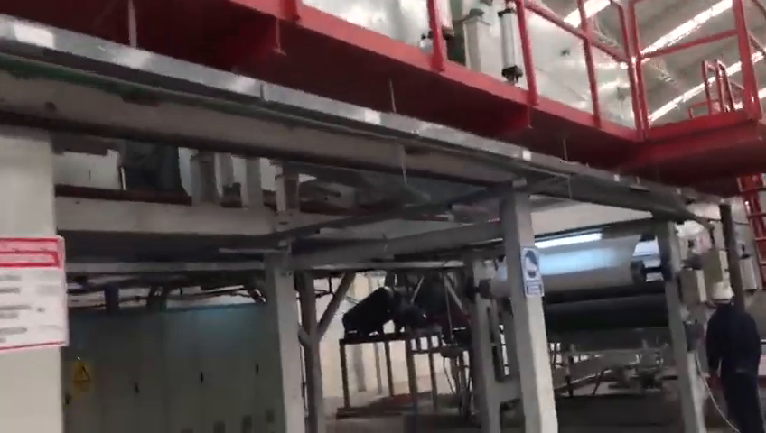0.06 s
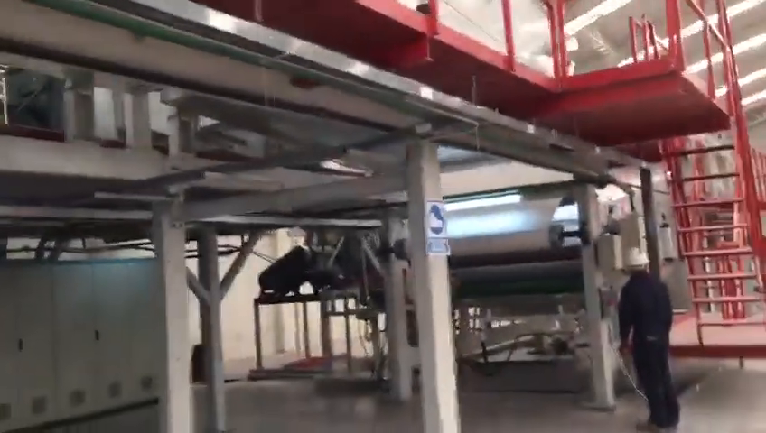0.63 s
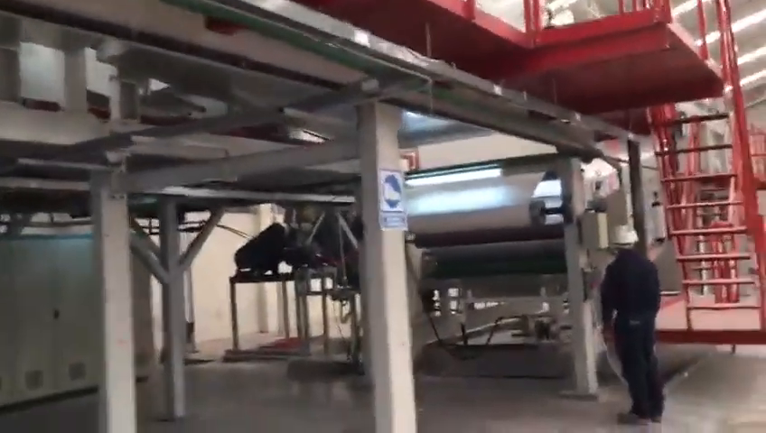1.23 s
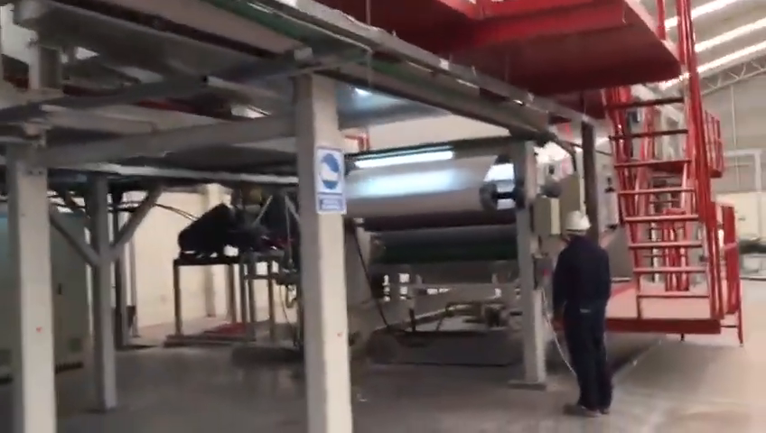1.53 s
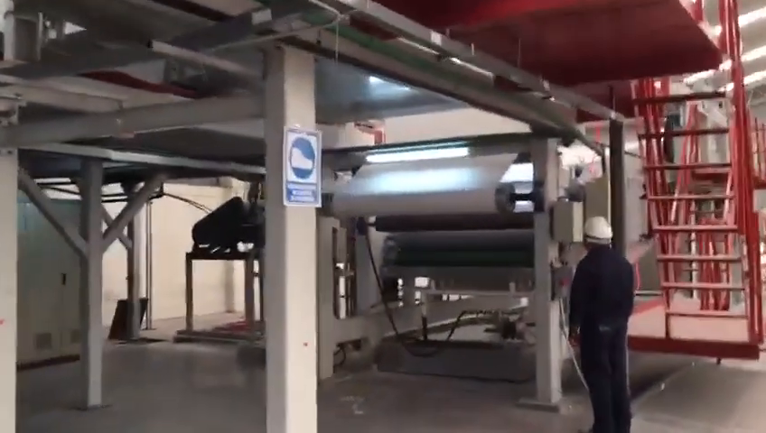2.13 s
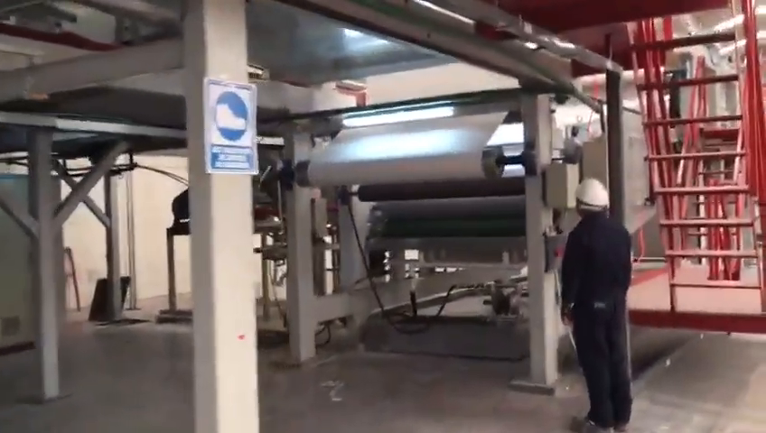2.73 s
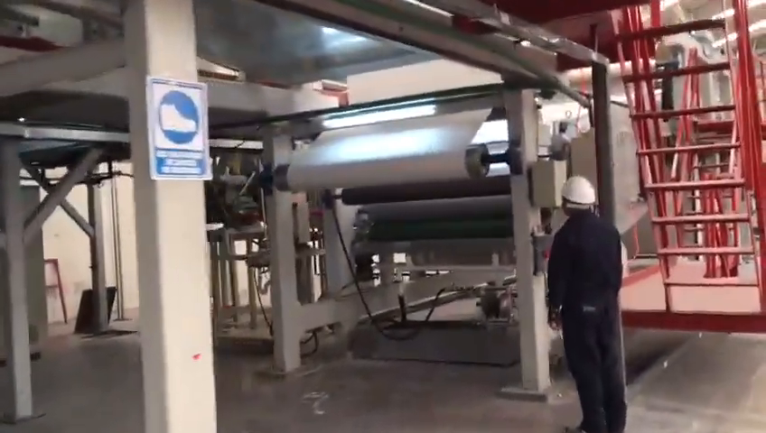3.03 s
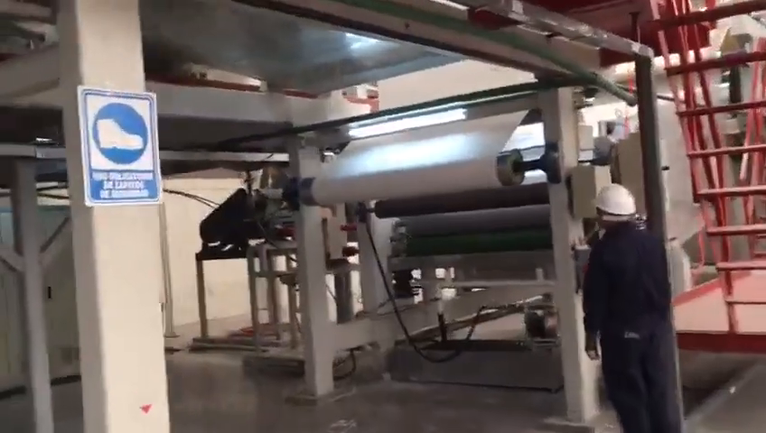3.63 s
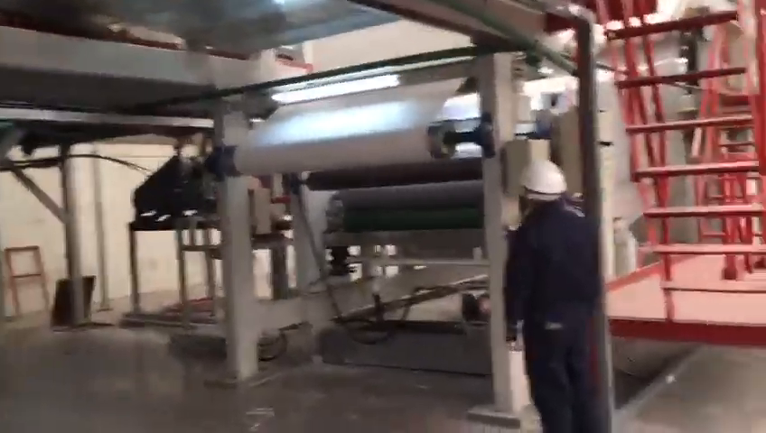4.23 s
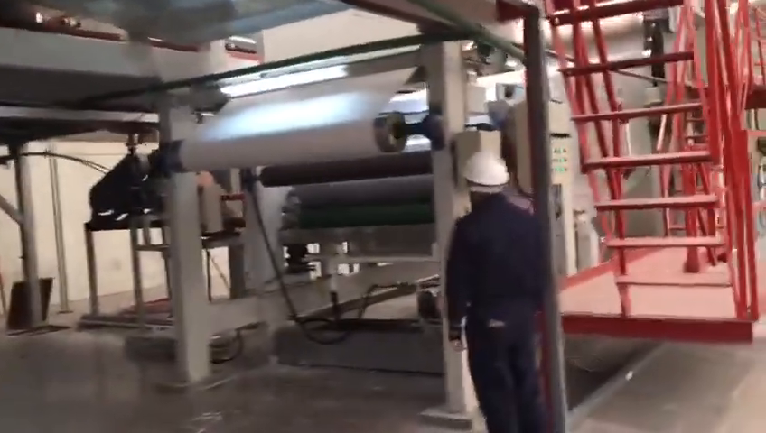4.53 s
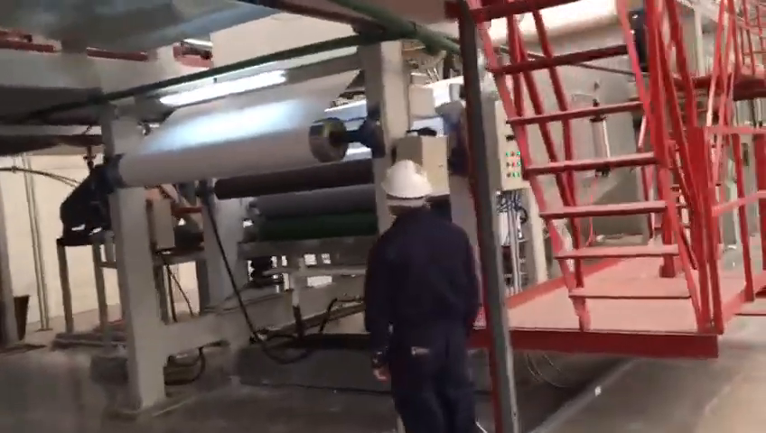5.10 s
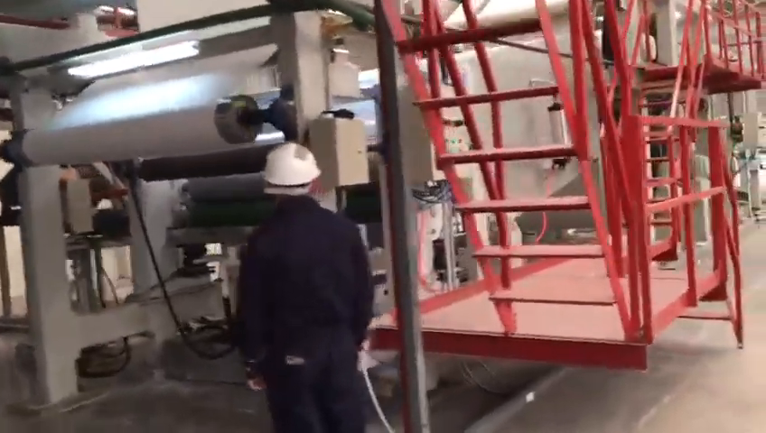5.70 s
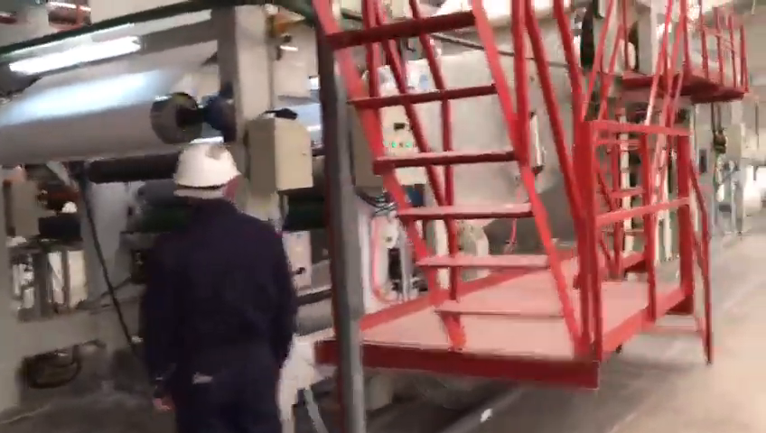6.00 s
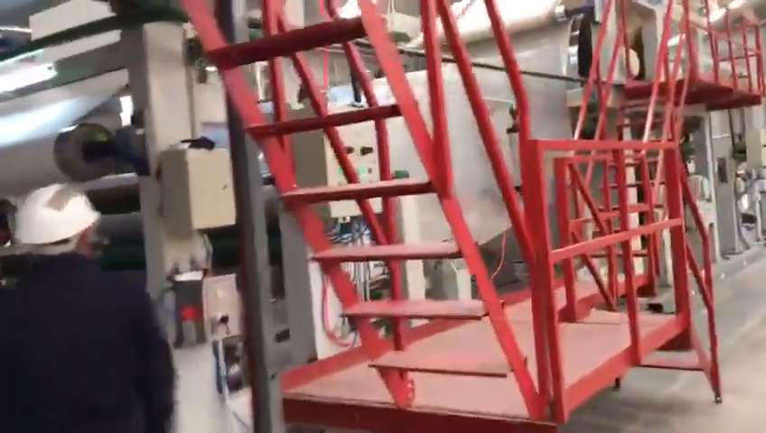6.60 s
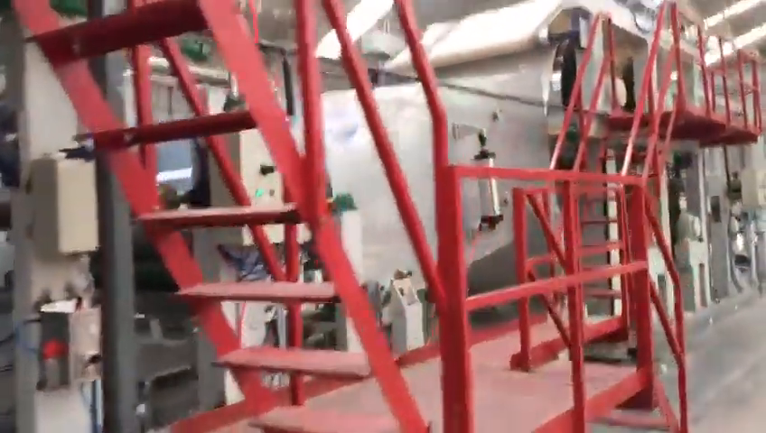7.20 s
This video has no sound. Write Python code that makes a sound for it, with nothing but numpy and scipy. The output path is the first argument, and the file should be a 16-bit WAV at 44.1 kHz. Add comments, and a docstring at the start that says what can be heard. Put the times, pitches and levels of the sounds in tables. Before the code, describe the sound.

A large factory machine runs with a steady din of rumbling rollers, roaring air, low hum and thin wavering whines.

```python
"""A factory hall, where a paper coating line runs while the microphone is carried slowly along it.
Rollers rumble, knock and squeak, the dryer's air roars and the paper web (the moving sheet) hisses.
The dryer fan hums and several drives whine; each tone swells and fades as the microphone moves through
the hall's standing waves, its loud and quiet spots. Rolling keeps the machine's metal singing,
a dry bearing squeals faintly and a loose part rattles."""
import sys
import numpy as np
from scipy import signal
from scipy.fft import rfft, irfft
from scipy.io import wavfile
from scipy.ndimage import uniform_filter1d

SR = 44100
rng = np.random.default_rng(int(sys.argv[2]) if len(sys.argv) > 2 else 0)


def log_audio(samples):
    """Write samples as a 16-bit WAV file to the path given in sys.argv[1]."""
    # one column per channel
    frames = np.atleast_2d(samples).T
    # limit to full scale, then quantise
    limited = np.clip(frames, -1, 1)
    pcm = np.round(limited * 32767).astype(np.int16)
    wavfile.write(sys.argv[1], SR, pcm)


N = 324135
TIME = np.arange(N) / SR
BINS = np.fft.rfftfreq(N, 1 / SR)


def gain_of(db):
    """Turns decibels into a number to multiply a sound by."""
    return 10 ** (np.asarray(db) / 20)


def unit_rms(x):
    """Scales a signal so that its average size (rms) is one."""
    return x / np.sqrt(np.mean(abs(x) ** 2) + 1e-20)


def along(walk, db):
    """The gain along the walk: joins (time, level) points and adds db to them all."""
    return gain_of(np.interp(TIME, *np.transpose(walk)) + db)


def bump(at, half):
    """A smooth rise and fall of height one around a moment."""
    return np.exp(-((TIME - at) / half) ** 2)


def noise(gain):
    """Noise with the given strength at each frequency."""
    return irfft(rfft(rng.standard_normal(N)) * gain, N) * np.sqrt(SR / 2)


def drift(rate):
    """A smooth random wobble that changes up to about rate times a second."""
    steps = np.arange(0, N + 128, 128)
    hz = np.fft.rfftfreq(2 * len(steps), 128 / SR)
    white = rng.standard_normal(2 * len(steps))
    slow = irfft(rfft(white) * np.exp(-.5 * (hz / rate) ** 2))[:len(steps)]
    return np.interp(np.arange(N), steps, unit_rms(slow - slow.mean()))


def din(spectrum, surge_db, surge_rate, patchy_db, patch_hz, patch_s):
    """A broad noise that surges at random, while narrow patches of it swell and fade."""
    hz, db = np.transpose(spectrum)
    smooth = noise(gain_of(np.interp(np.log(BINS + 1), np.log(hz + 1), db)))
    grid = signal.stft(smooth, nperseg=2048, noverlap=1536)[2]  # frequency by time
    bin_hz, hop_s = SR / 2048, 512 / SR
    patches = uniform_filter1d(rng.standard_normal(grid.shape), max(round(patch_hz / bin_hz), 1), axis=0)
    patches = uniform_filter1d(patches, max(round(patch_s / hop_s), 1), axis=1)
    grid = grid * unit_rms(gain_of(patchy_db * unit_rms(patches)))
    patchy = signal.istft(grid, nperseg=2048, noverlap=1536)[1][:N]
    return patchy * gain_of(surge_db * drift(surge_rate))


def hall_tone(turns, waver_hz, direct):
    """A tone in the hall: a steady direct part plus wavering echoes. turns counts its cycles."""
    echoes = (drift(waver_hz) + 1j * drift(waver_hz)) / np.sqrt(2)
    tone = np.exp(2j * np.pi * (turns + rng.random()))
    return unit_rms(((direct + echoes) * tone).real)


def hall_tones(rows, direct):
    """Several steady drives heard together through the hall."""
    return sum(gain_of(db) * hall_tone(hz * TIME, waver_hz, direct) for hz, db, waver_hz in rows)


def roller_rumble():
    """The turning rollers make a low, uneven rumble."""
    # the rumble's spectrum: f/Hz, level/dB
    spectrum = [(10, -82.5), (20, -64.5), (30, -62), (45, -48), (60, -43.5), (85, -48.5), (108, -45),
                (130, -44.5), (155, -44), (230, -43), (265, -46), (350, -44), (425, -58), (600, -71),
                (1200, -92.5)]
    # its loudness along the walk: t/s, level/dB
    walk = [(0.0, 1.5), (0.65, -1), (1.2, 0.5), (1.75, -0.5), (2.2, -0.5), (3.1, -0.5), (4.6, 0), (5.3, 0),
            (6.2, -0.5), (6.6, 0), (7.35, 0)]
    rumble = din(spectrum, surge_db=1.0, surge_rate=8.9, patchy_db=2.5, patch_hz=90, patch_s=.06)
    return rumble * along(walk, db=-0.03)


def dryer_roar(roar_top_hz=800):
    """Air rushes through the dryer; its low roar eases for moments while the hiss above holds."""
    # the air's spectrum: f/Hz, level/dB
    spectrum = [(200, -70), (450, -54), (610, -50.5), (700, -52), (780, -57.5), (860, -59), (940, -61),
                (1270, -63.5), (1530, -65), (2000, -65.5), (2350, -67.5), (2750, -71), (4000, -87),
                (8000, -100)]
    # dips in the roar: middle t/s, half length/s, level/dB
    dips = [(2.05, 0.22, -2), (3.01, 0.043, -5), (5.772, 0.069, -4.5), (6.28, 0.073, -4)]
    # louder when the dryer is nearer: t/s, level/dB
    walk = [(0.0, 1.5), (0.6, 0), (1.05, -0.9), (1.5, 0), (2.05, -1), (2.75, 0.5), (3.05, -1.3),
            (3.6, -0.5), (4.2, -1), (4.6, -0.5), (5.55, 0), (5.75, -0.5), (6.3, -0.5), (6.65, -0.1),
            (7.0, -0.6), (7.35, -1)]
    air = din(spectrum, surge_db=0.72, surge_rate=32, patchy_db=2.0, patch_hz=90, patch_s=.05)
    roar = irfft(rfft(air) / (1 + (BINS / roar_top_hz) ** 10), N)
    easing = gain_of(sum(db * bump(s, half) for s, half, db in dips))
    return (air + roar * (easing - 1)) * along(walk, db=0.13)


def paper_hiss():
    """The running sheet of paper hisses almost evenly."""
    # the hiss's spectrum: f/Hz, level/dB
    spectrum = [(1200, -94), (2700, -74), (3500, -71.5), (4500, -74), (4930, -78), (5350, -76),
                (6200, -78.5), (7700, -83.5), (8500, -83), (9600, -85.5), (10300, -93.5)]
    return din(spectrum, surge_db=0.07, surge_rate=9.7, patchy_db=1.3, patch_hz=300, patch_s=.07)


def fan_hum(blade_hz=136.9, speed_wander=0.00212):
    """Blades passing the housing hum; swirling air roughens the tone an octave up."""
    # loudness at 1, 2 and 6 times the blade pitch along the walk: t/s, level/dB
    blade_walk = [(0.0, -24), (0.45, -30.5), (1.5, -30), (2.2, -24.5), (3.0, -31), (3.33, -22), (3.55, -26),
                  (4.15, -23), (4.43, -32), (4.63, -22), (4.95, -34), (5.25, -26.5), (5.95, -25),
                  (6.35, -28.5), (6.55, -44), (7.35, -31)]
    octave_walk = [(0.0, -20), (0.25, -45), (0.42, -19), (0.72, -39), (0.95, -21.5), (1.25, -21),
                   (1.42, -22.5), (1.56, -35), (1.7, -27), (1.92, -16.5), (2.2, -17.5), (2.33, -25),
                   (2.58, -31.5), (2.75, -22.5), (3.22, -20), (3.38, -28), (3.6, -28.5), (3.92, -20),
                   (4.45, -25.5), (4.7, -34.5), (5.05, -28.5), (5.7, -38), (6.2, -19), (6.45, -32),
                   (6.9, -24.5), (7.35, -30.5)]
    sixth_walk = [(0.0, -43), (1.6, -42), (2.35, -38), (2.95, -46), (3.23, -29), (3.5, -48), (4.1, -49),
                  (4.4, -42), (5.4, -44), (7.1, -39.5), (7.35, -40)]
    turns = np.cumsum(blade_hz * (1 + speed_wander * drift(1.33))) / SR
    blade = along(blade_walk, db=-1.0) * hall_tone(turns, waver_hz=4.6, direct=5.6)
    clean = hall_tone(2 * turns, waver_hz=5.8, direct=4)
    rough = gain_of(-5.0) * hall_tone(2 * turns, waver_hz=26, direct=0)
    octave = along(octave_walk, db=-2.1) * (clean + rough)
    fourth = gain_of(-38.0) * hall_tone(4 * turns, waver_hz=3, direct=1.2)
    sixth = along(sixth_walk, db=-1.5) * hall_tone(6 * turns, waver_hz=4, direct=1.5)
    return blade + octave + fourth + sixth


def singing_metal(flutter_db=1.5):
    """Rolling contact keeps the metal ringing in a few narrow bands."""
    # the ringing bands: f/Hz, width/Hz, peak level/dB
    bands = [(1407, 79, -62), (1628, 55, -69.5), (1834, 164, -68.5), (2450, 58, -74)]
    # their loudness along the walk: t/s, level/dB
    walk = [(0.0, -8), (0.55, 5), (0.9, 1), (1.6, 4), (1.95, 1.5), (2.4, 1), (2.9, 0.5), (3.9, 3.5),
            (5.0, -2.5), (6.6, 3.5), (7.35, 0.5)]
    shape = sum(gain_of(db) * np.exp(-2 * np.log(2) * ((BINS - hz) / width) ** 2)
                for hz, width, db in bands)
    return noise(shape) * along(walk, db=0.4) * gain_of(flutter_db * drift(7.4))


def motor_hum(hz=61.8, crest_s=0.99, every_s=0.87, depth=0.55):
    """The main motor's low hum throbs as a direct wave and a weaker one slide in and out of step."""
    # average loudness along the walk: t/s, level/dB
    walk = [(0.0, -40), (0.35, -17), (0.9, -20), (1.15, -28), (1.75, -23), (2.15, -37), (2.7, -31),
            (3.1, -20), (3.5, -30), (4.35, -30), (5.2, -38), (5.58, -24), (5.75, -36), (6.1, -27),
            (6.5, -31), (6.9, -22), (7.35, -24)]
    throb = unit_rms(abs(1 + depth * np.exp(2j * np.pi * (TIME - crest_s) / every_s)))
    return along(walk, db=-5.5) * hall_tone(hz * TIME, waver_hz=1.6, direct=1.5) * throb


def shaft_drone(hz=183.2):
    """A spinning shaft drones on one low note."""
    # loudness along the walk: t/s, level/dB
    walk = [(0.0, -34), (1.2, -33), (1.5, -24.5), (1.82, -23.5), (2.1, -37), (2.85, -44), (3.1, -30),
            (4.0, -31), (4.75, -34), (5.3, -23), (5.55, -33), (5.9, -26), (6.2, -46), (6.47, -19),
            (6.7, -28), (7.0, -33), (7.35, -35)]
    return along(walk, db=-2.5) * hall_tone(hz * TIME, waver_hz=3.5, direct=2.5)


def gear_whine(hz=1315.8):
    """The main drive's gears whine on one high note."""
    # loudness along the walk: t/s, level/dB
    walk = [(0.0, -50), (0.42, -48), (0.53, -39), (0.92, -45), (1.29, -36), (1.6, -50), (1.9, -42),
            (2.27, -39), (2.47, -52), (2.75, -34.5), (3.05, -46), (3.23, -40), (3.45, -45), (3.9, -43),
            (4.22, -45), (4.37, -32), (4.54, -49), (6.12, -51), (6.32, -36), (6.48, -45), (6.64, -39),
            (7.0, -50), (7.35, -48)]
    return along(walk, db=-1.1) * hall_tone(hz * TIME, waver_hz=5, direct=2.4)


def drive_tones(ring_hz=744.2):
    """Each of the other drives holds its own speed and is heard largely through the hall's echoes."""
    # the drives' notes: f/Hz, level/dB, wavering/Hz
    pair_notes = [(980.5, -44, 6), (991, -47, 8)]  # two at nearly the same pitch
    cluster_notes = [(1376.8, -46, 3), (1402.5, -45, 4), (1415, -49, 6), (1431, -45.5, 5), (1445, -50, 6),
                     (1466.5, -45, 3)]  # six close together
    other_notes = [(45.8, -41, 1), (92.3, -42, 1), (119.8, -38.5, 1.5), (152, -36, 2.5), (212.6, -36.5, 1),
                   (372, -40, 2.5), (403.7, -41.5, 1.2), (1041, -51, 4), (1115, -56, 2), (2155, -58.5, 3),
                   (2478, -57, 9), (2624, -58, 3), (8014, -68.5, 14), (8390, -68, 14)]  # motors, shafts and gears, low to high
    # loudness along the walk: t/s, level/dB
    pair_walk = [(0.0, -5), (0.3, -7), (0.75, 2.5), (1.45, -1.5), (1.75, 5.5), (2.35, 1), (2.75, -12),
                 (3.25, 0), (3.75, 6.5), (4.05, -6), (4.4, 1), (4.85, -4), (5.35, -1), (6.3, -5),
                 (7.03, 1.5), (7.35, -4)]
    cluster_walk = [(0.0, 1.5), (0.55, 2.5), (0.9, 1), (1.35, -0.5), (1.9, -1.5), (2.35, 3), (2.8, -2),
                    (3.2, 4), (3.55, -6), (3.7, 0), (3.95, 2), (4.05, -1), (5.3, -0.5), (5.5, 5.5),
                    (5.65, -2), (7.35, -1)]
    ring_walk = [(0.0, -43), (0.6, -44), (1.15, -33.5), (1.7, -43), (2.75, -36), (3.4, -44), (4.3, -45),
                 (5.1, -35.5), (5.75, -50), (6.5, -41), (7.35, -45)]  # one drive with a mid-pitched ring
    pair = along(pair_walk, db=1.7) * hall_tones(pair_notes, direct=0.6)
    cluster = along(cluster_walk, db=-0.1) * hall_tones(cluster_notes, direct=0.7)
    ring = along(ring_walk, db=-1.0) * hall_tone(ring_hz * TIME, waver_hz=3.7, direct=1.2)
    return pair + cluster + ring + hall_tones(other_notes, direct=0.91)


def bearing_squeal(hz=2746.5, boost_db=0.5, steady_db=-59):
    """A dry bearing holds one thin note that swells whenever it rubs."""
    # the rubs: middle t/s, half length/s, level/dB
    rubs = [(0.07, 0.08, -50), (0.5, 0.12, -56), (1.55, 0.25, -48), (2.8, 0.14, -46), (3.26, 0.06, -43),
            (3.57, 0.13, -48), (5.24, 0.12, -52), (5.445, 0.05, -41), (5.97, 0.06, -47), (6.22, 0.1, -50),
            (6.58, 0.07, -50), (6.82, 0.06, -48), (7.12, 0.08, -48)]
    swells = sum(gain_of(db + boost_db) * bump(s, half) for s, half, db in rubs)
    return (gain_of(steady_db) + swells) * hall_tone(hz * TIME, waver_hz=9, direct=2.0)


def lulls():
    """A gain that makes the rumble and the fan's hum dip briefly."""
    # the dips: middle t/s, half length/s, level/dB
    dips = [(0.272, 0.059, -5), (5.674, 0.07, -5), (6.538, 0.015, -12), (6.805, 0.028, -1.5)]
    return gain_of(sum(db * bump(s, half) for s, half, db in dips))


def blows(hits, modes, level_db, rise_s):
    """Each blow briefly rings the struck part's own notes, its modes."""
    out = np.zeros(N)
    t = np.arange(SR // 3) / SR
    rise = np.minimum(t / rise_s, 1)
    for s, hit_db in hits:
        ring = sum(gain_of(db - 60 * t / t60) * np.sin(2 * np.pi * (hz * t + rng.random()))
                   for hz, db, t60 in modes)
        part = out[round(s * SR):][:len(t)]
        part += (gain_of(hit_db + level_db) * rise * ring)[:len(part)]
    return out


def roller_knocks():
    """Soft knocks in the rollers ring low and die quickly."""
    # the knocks: t/s, relative level/dB
    hits = [(0.321, -12), (0.777, -6), (1.003, -11), (1.264, -5), (1.801, -11), (2.342, -7.5), (2.875, -8),
            (3.095, -10), (3.246, -8), (3.774, -13), (5.018, -2.5), (5.387, -13), (5.575, -12), (5.79, -8),
            (6.135, -5), (6.578, -3.5)]
    # the notes of a knock: f/Hz, relative level/dB, time to fade by 60 dB/s
    modes = [(170, -6, 0.1), (227, -4.5, 0.15), (314, 4.5, 0.077)]
    return blows(hits, modes, level_db=-8, rise_s=0.0027)


def loose_rattles():
    """A loose part rattles lightly now and then."""
    # the rattles: t/s, relative level/dB
    hits = [(0.98, -18.5), (1.435, -21), (2.525, -20), (3.6, -19.5), (6.66, -18.5)]
    # the part's notes: f/Hz, relative level/dB, time to fade by 60 dB/s
    modes = [(560, 6, 0.14), (620, -3, 0.18), (669, -3.5, 0.24), (756, -6, 0.13)]
    return blows(hits, modes, level_db=-0.5, rise_s=0.0081)


def roller_squeaks(half_length_s=0.027):
    """A roller rubs for a moment and gives a thin, wavering note."""
    # the squeaks: middle t/s, f/Hz, level/dB
    squeaks = [(1.01, 1483, -31), (1.155, 1394, -29), (3.68, 1420, -29), (4.36, 1395, -32),
               (7.125, 4355, -44)]
    return sum(gain_of(db) * bump(s, half_length_s) * hall_tone(hz * TIME, waver_hz=25, direct=2.5)
               for s, hz, db in squeaks)


def scene():
    """The line's steady noises and tones, with short sounds on top, in one channel."""
    rumble = roller_rumble()
    rush = dryer_roar() + paper_hiss()
    low_din = (rumble + fan_hum()) * lulls()
    tones = singing_metal() + motor_hum() + shaft_drone() + gear_whine() + drive_tones()
    steady = low_din + rush + tones + bearing_squeal()
    return (steady + roller_knocks() + loose_rattles() + roller_squeaks())[None]


def record(dry):
    """Cuts away the highest treble."""
    cutoff_hz = 10270
    lowpass = signal.firwin(801, cutoff_hz, window=("kaiser", 9), fs=SR)
    return signal.oaconvolve(dry, lowpass[None], "same")


dry = scene()
out = record(dry)
log_audio(out)
```